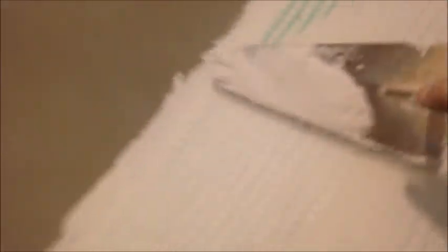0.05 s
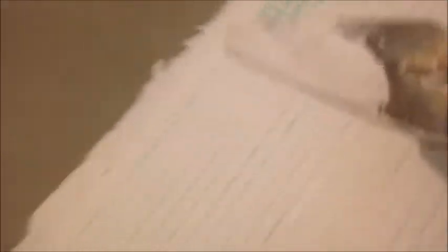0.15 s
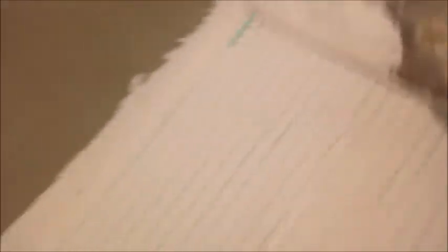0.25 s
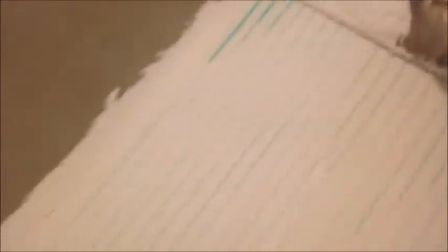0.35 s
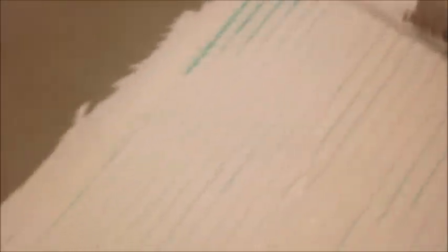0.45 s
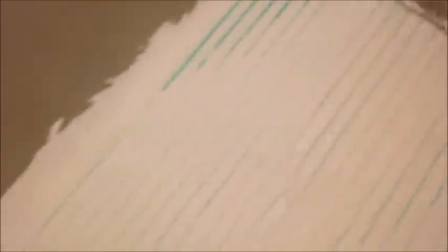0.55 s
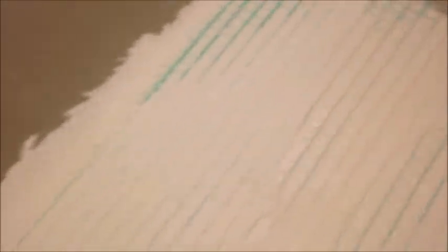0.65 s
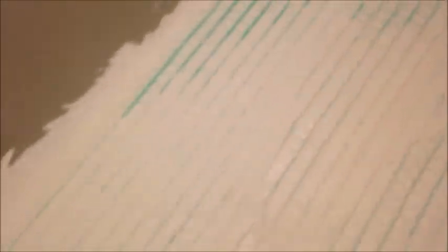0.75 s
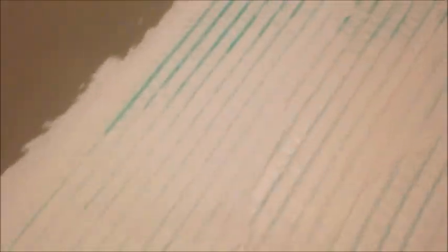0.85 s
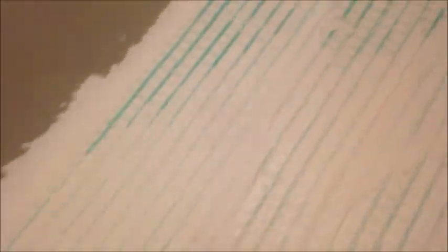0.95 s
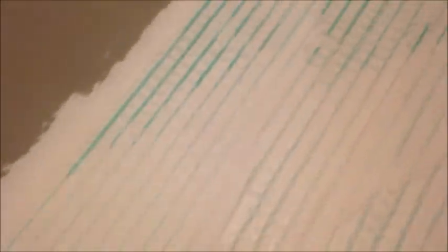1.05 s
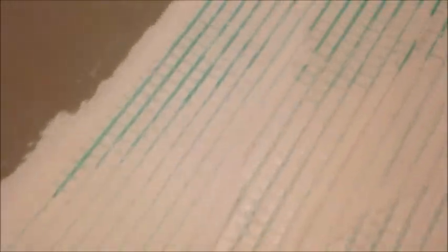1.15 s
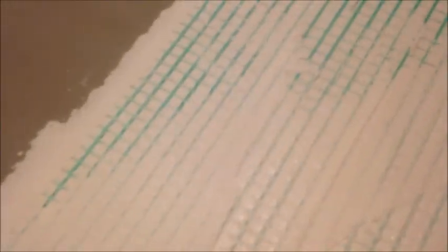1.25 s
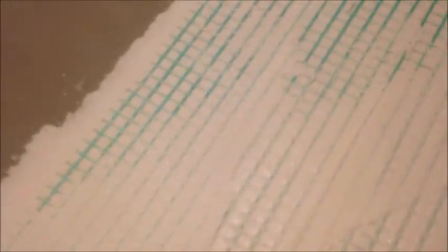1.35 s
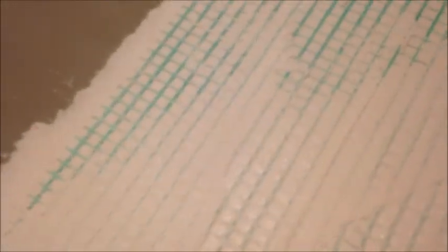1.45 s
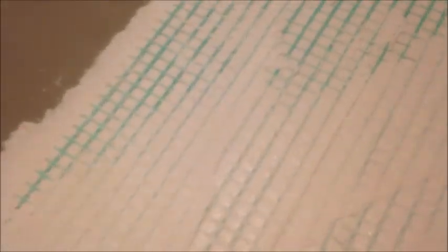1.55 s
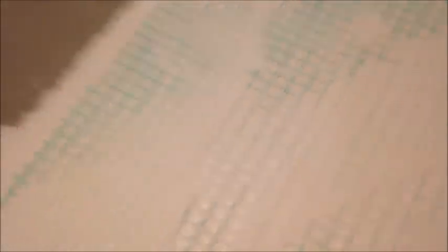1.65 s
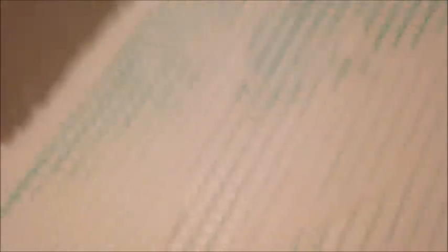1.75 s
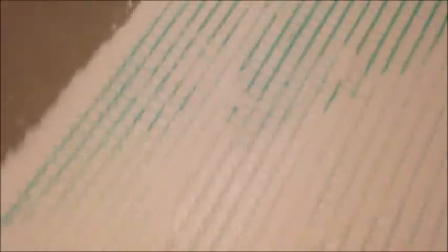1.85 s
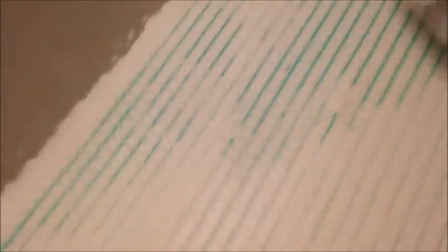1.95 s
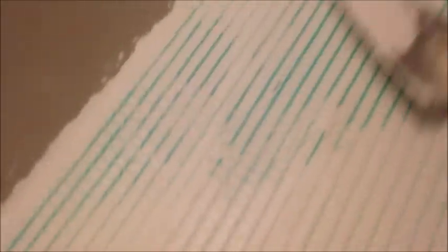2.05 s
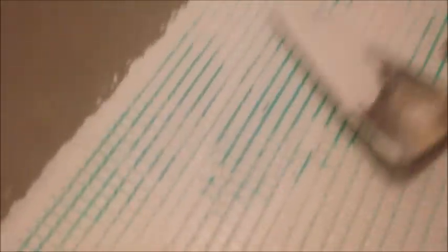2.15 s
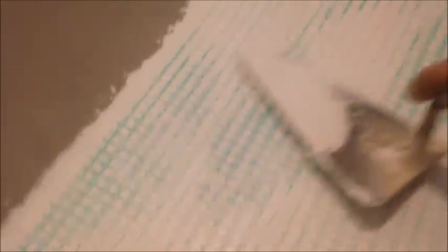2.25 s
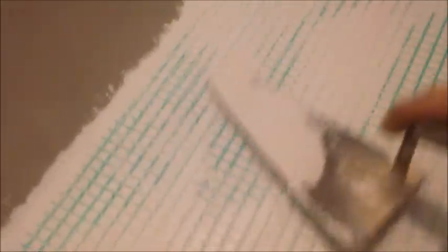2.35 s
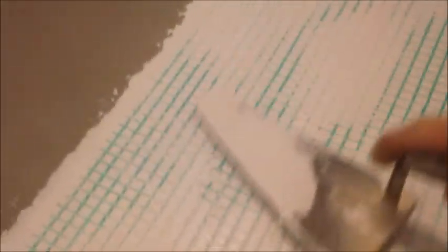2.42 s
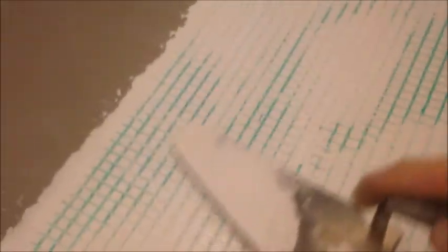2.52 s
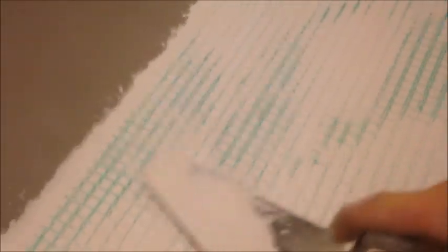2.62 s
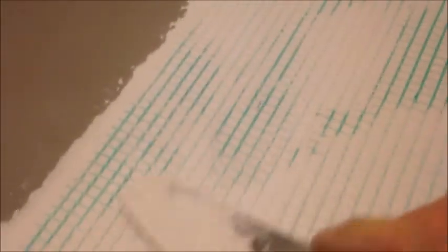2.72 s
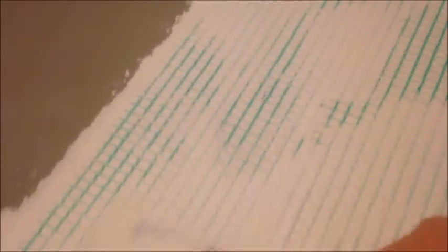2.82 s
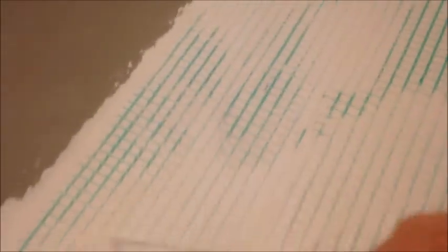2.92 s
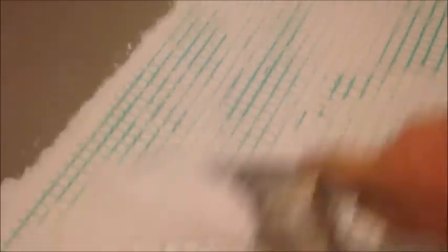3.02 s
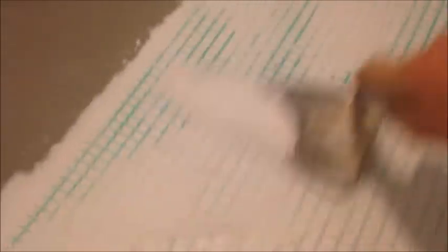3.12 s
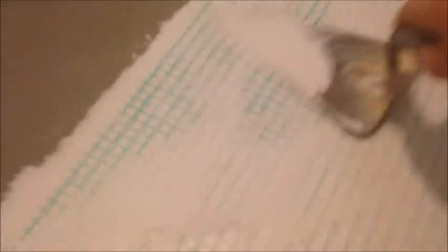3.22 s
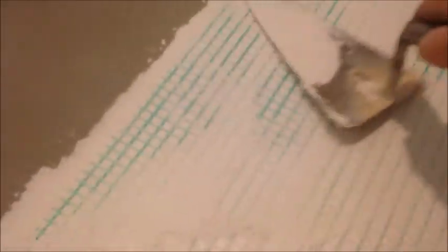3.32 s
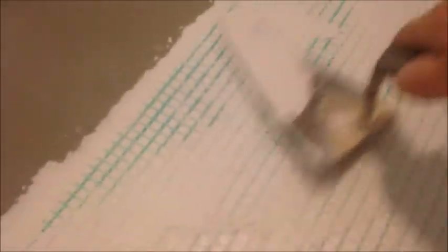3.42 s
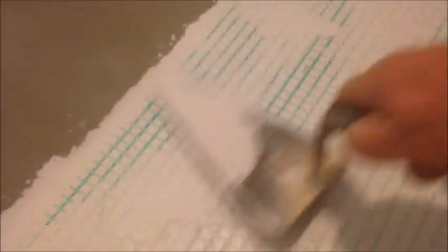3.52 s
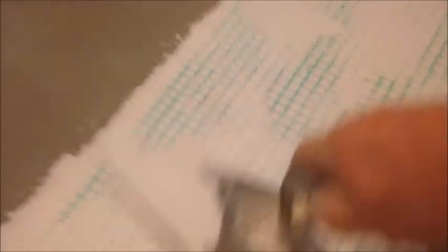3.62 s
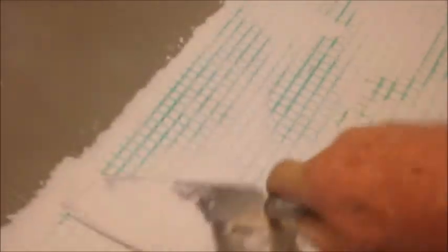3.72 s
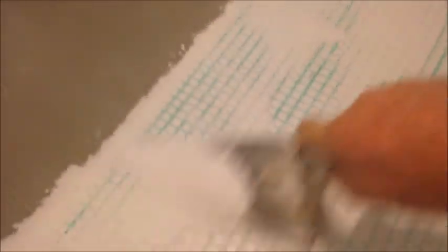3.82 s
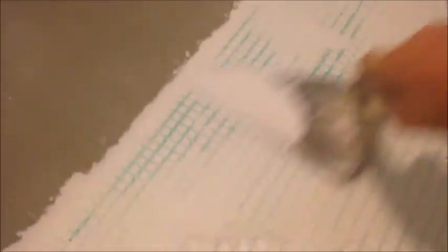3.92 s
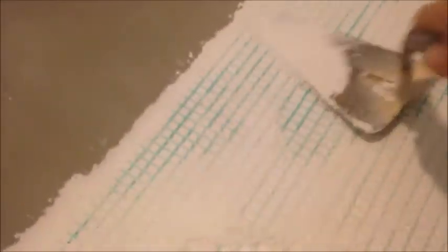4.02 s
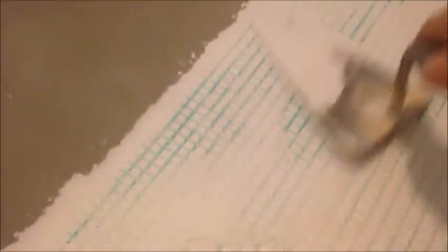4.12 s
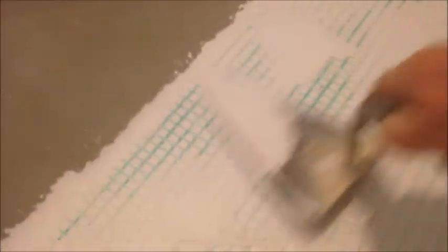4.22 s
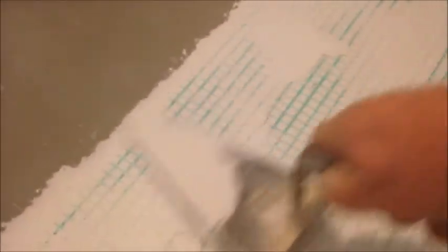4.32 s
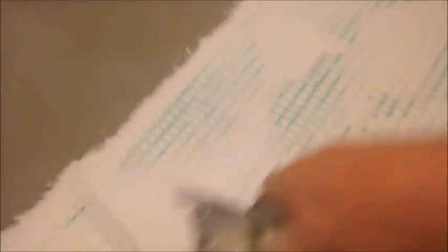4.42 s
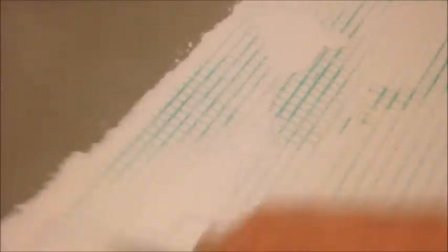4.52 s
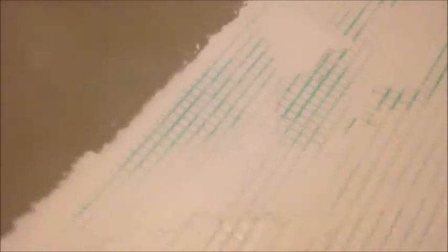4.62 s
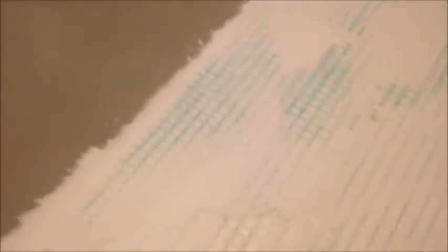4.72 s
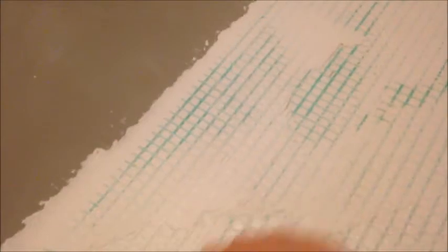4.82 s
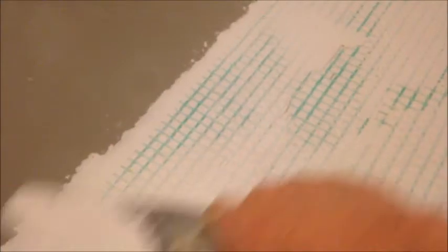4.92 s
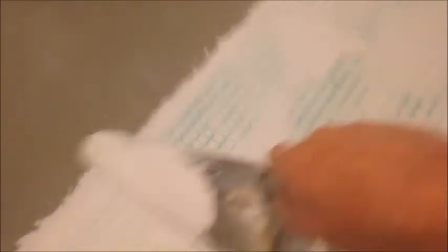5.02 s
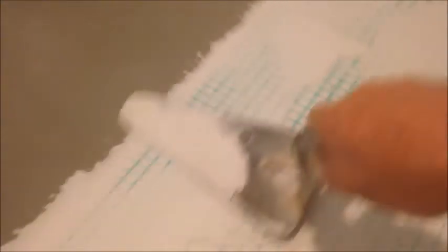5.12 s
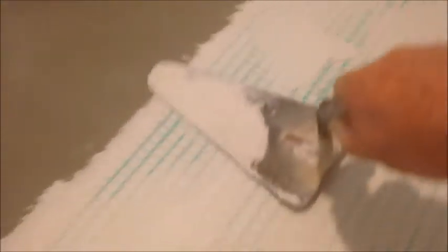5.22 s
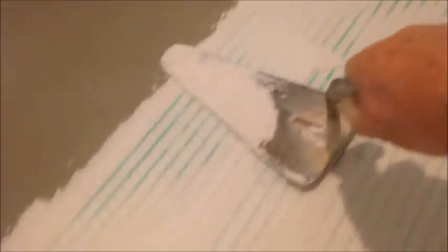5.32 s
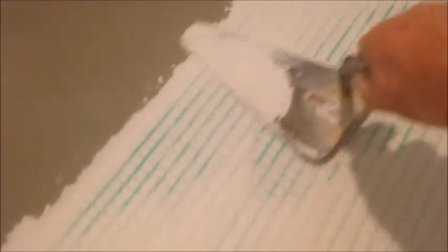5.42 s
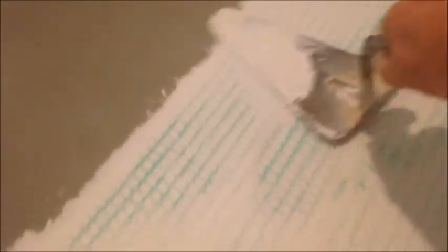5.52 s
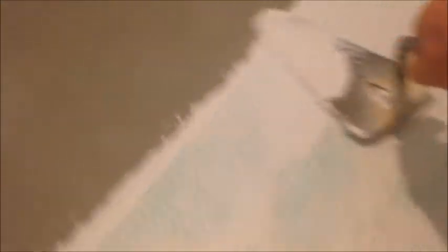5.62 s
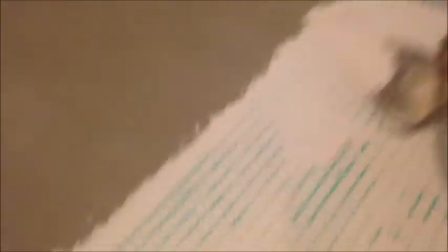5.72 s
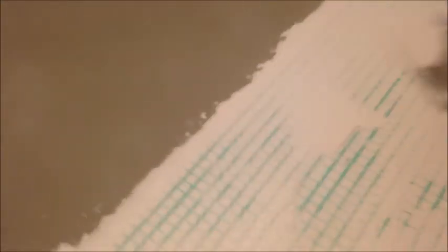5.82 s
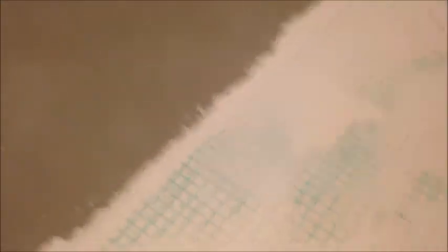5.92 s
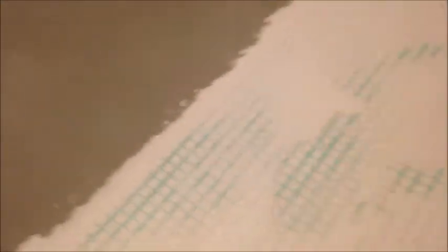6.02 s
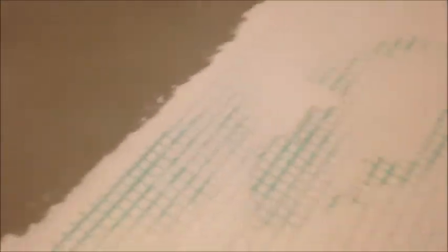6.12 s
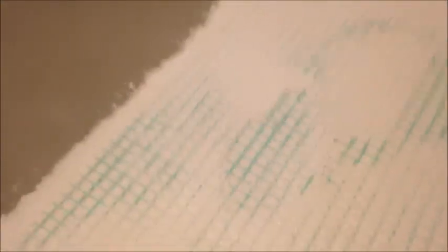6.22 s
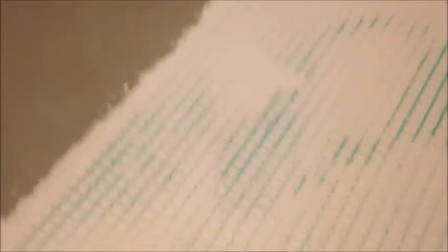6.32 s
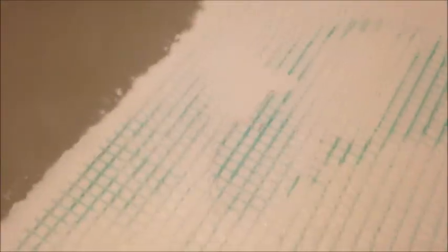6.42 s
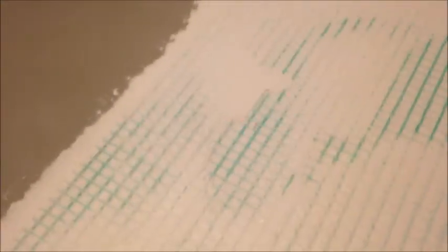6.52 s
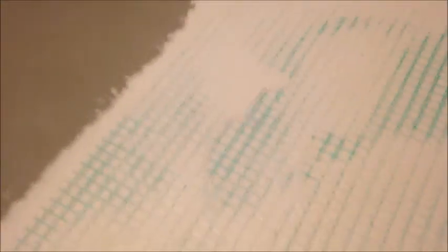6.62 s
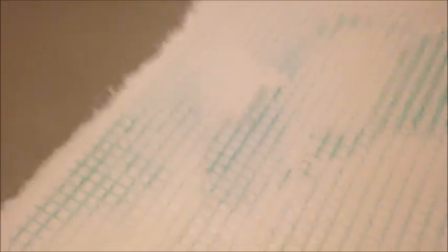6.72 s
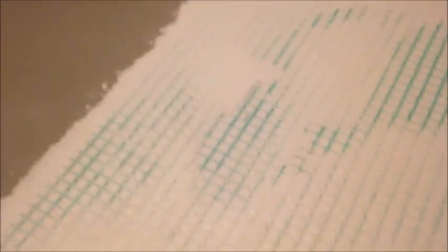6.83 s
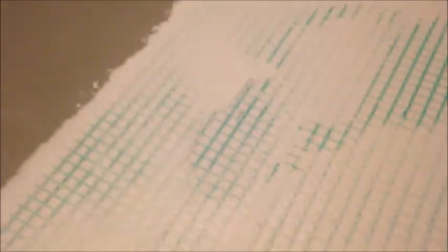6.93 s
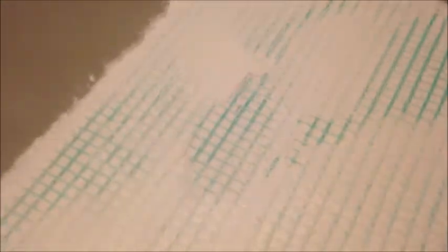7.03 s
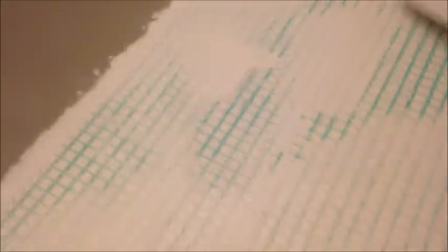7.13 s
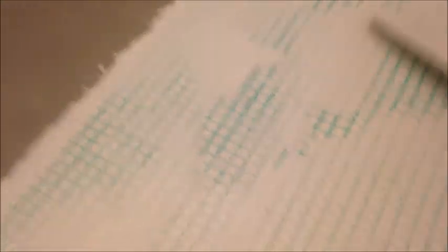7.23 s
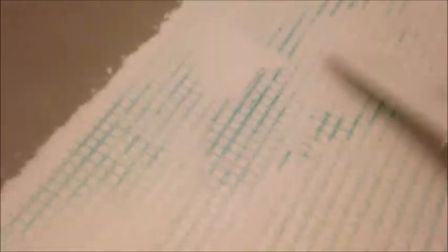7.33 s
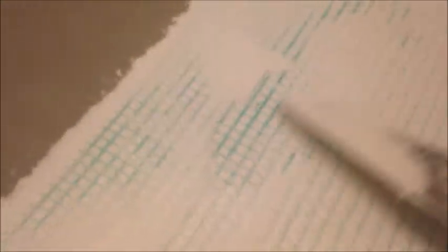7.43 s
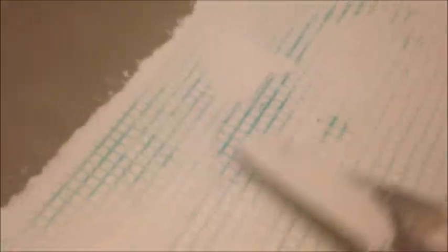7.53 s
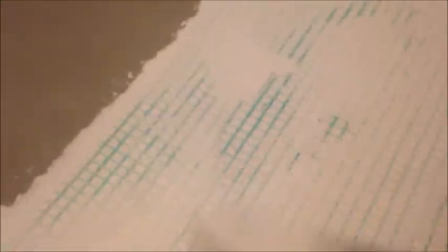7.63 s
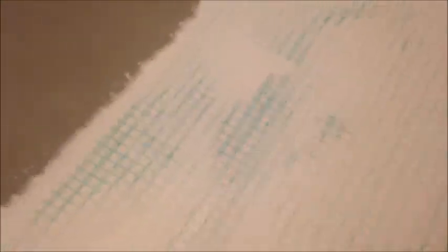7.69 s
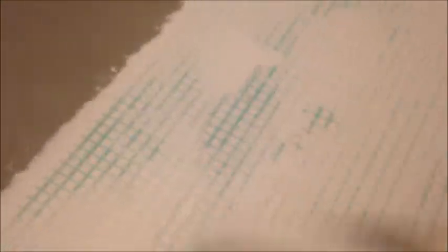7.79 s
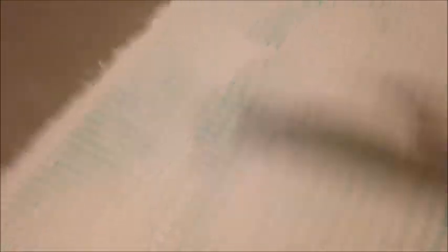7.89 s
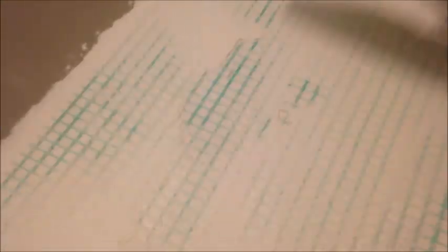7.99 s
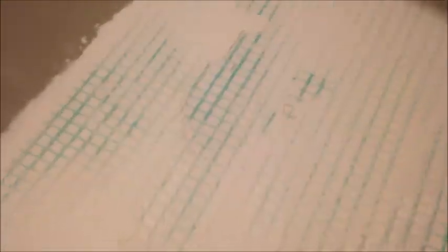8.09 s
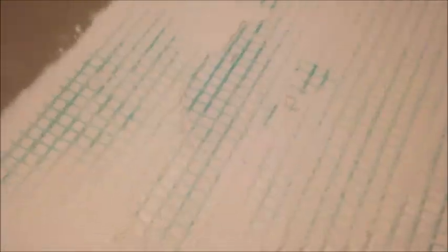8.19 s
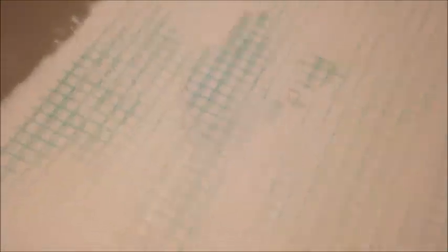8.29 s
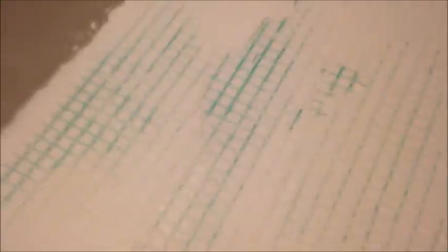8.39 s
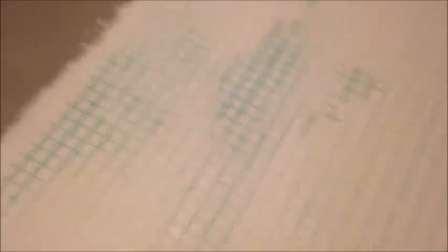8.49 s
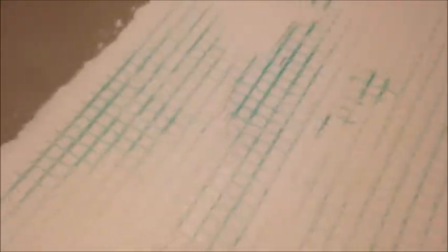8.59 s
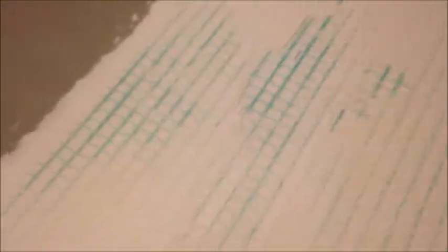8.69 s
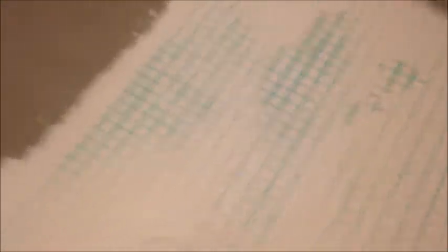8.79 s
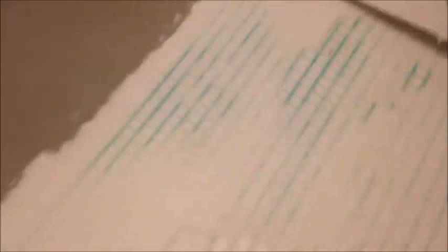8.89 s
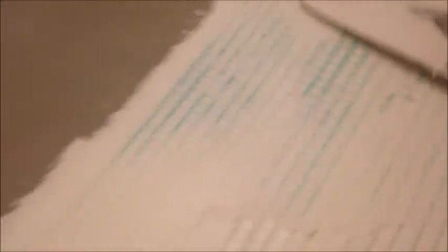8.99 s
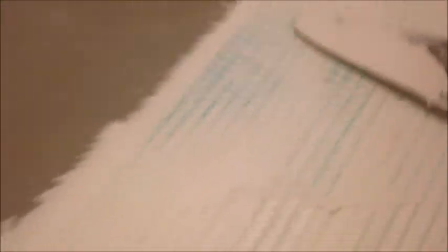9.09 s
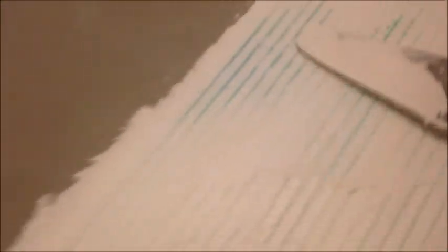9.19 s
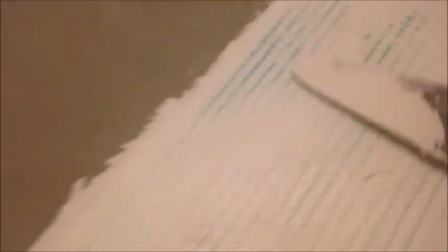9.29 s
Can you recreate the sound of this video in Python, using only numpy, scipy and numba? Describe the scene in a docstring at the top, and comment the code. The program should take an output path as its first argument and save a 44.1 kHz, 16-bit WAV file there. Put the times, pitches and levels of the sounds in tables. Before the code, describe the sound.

Sandy, crunching trowel strokes hiss and rasp across a hollow board, speeding up, then pausing, with metallic clicks and heavy landing thuds.

```python
"""Bare room: a steel trowel smooths wet, sandy adhesive into glass-fibre mesh on a hollow board.
Random sand-grain slips under the blade crunch, hiss and drive resonances of blade and board.
Mesh threads snap past the edge, trapped grains screech, and the edge clacks on grit and lumps.
The loaded trowel lands with dull thuds; diffuse echoes and quiet air noise lie behind."""
import sys
import numpy as np
from scipy import signal
from scipy.fft import rfft, irfft
from scipy.io import wavfile
from numba import njit

SR = 44100
rng = np.random.default_rng(int(sys.argv[2]) if len(sys.argv) > 2 else 0)


def digitize_waveform(pressure):
    """Quantize a signal to 16-bit integers and store it at the path in sys.argv[1].

    Rows of a 2-D input are taken as channels; values are limited to [-1, 1].
    """
    field = np.atleast_2d(pressure).T
    bounded = np.clip(field, -1, 1)
    quanta = np.round(bounded * 32767).astype(np.int16)
    wavfile.write(sys.argv[1], SR, quanta)


N = 412335

# Pushes of the trowel; part levels apply at the hardest point, before RESPONSE and the part trims:
# start t/s, swelling t/s, easing t/s, swell range/dB, ease range/dB, sand hiss level/dB, blade rasp level/dB,
# blade ring level/dB, board growl level/dB, drumming level/dB, body level/dB,
# edge sharpness (grit re hiss) level/dB, board f/Hz, blade f/Hz
PUSHES = [ (0.01, 0.0038, 0.04, -17, 5, -64.5, -62, -57.5, -61.5, -53, -49, -2, 590, 1770),
          (0.245, 0.0091, .012, 3.5, 7, -35.5, -39, -53, -33.5, -39, -37.5, -9, 710, 1770),
          (0.325, 0.08, 0.057, 2.5, -5.5, -36.5, -34.5, -43, -38, -52, -47, -8.5, 670, 1850),
          (0.455, 0.18, 0.14, 3, 3.2, -29, -33, -35.5, -24.5, -39, -39.5, -8, 576, 1360),
          (0.789, 0.094, 0.19, 1.5, 7.5, -28.5, -31, -39, -23.5, -42.5, -43, -8.5, 500, 1900),
          (1.09, 0.03, 0.33, -0.5, 7, -34, -42, -42, -37.5, -48.5, -45.5, -7, 635, 1720),
          (1.621, 0.12, 0.098, 6.5, 0.5, -39.5, -42.5, -59, -42.5, -55.5, -49, -4.5, 660, 1630),
          (2.035, 0.26, 0.062, 6, 1, -34, -35, -46, -37, -50, -44, -5, 716, 1570),
          (2.39, 0.11, 0.12, 0.5, -1, -30.5, -35.5, -59, -32, -43.5, -50, -9.5, 726, 1570),
          (2.66, 0.049, 0.13, -1.5, 4, -29.5, -34, -42, -30, -42.5, -49.5, -10.5, 567, 1610),
          (2.87, 0.1, 0.059, 4, 3, -32, -32.5, -38, -35.5, -41, -47, -11, 646, 1860),
          (3.257, 0.062, 0.072, 2.5, 1.5, -24.5, -25.5, -26.5, -22, -41, -47.5, -9.5, 628, 1890),
          (3.592, 0.023, 0.1, 5.5, 2, -20.5, -20, -46, -21, -40.5, -43, -11.5, 720, 1930),
          (3.74, 0.064, 0.049, 1, 8.5, -26, -24, -37, -23, -39, -38, -6.5, 613, 1850),
          (3.97, 0.012, 0.023, 3, -5.5, -32.5, -37, -50, -47, -59, -55, -7, 644, 1800),
          (4.037, 0.033, 0.11, 0, 5, -23.5, -24, -25.5, -17.5, -36, -43.5, -10.5, 590, 1480),
          (4.352, 0.037, 0.15, 6, 7.5, -21, -23.5, -36, -25.5, -44.5, -44.5, -6, 700, 1860),
          (4.583, 0.019, 0.068, 1.5, 4, -24, -24.5, -42, -33.5, -43.5, -41, -5.5, 690, 1970),
          (4.68, 0.059, 0.021, 3.5, 3, -24, -22.5, -37, -28, -49, -42, -5, 796, 1250),
          (4.955, 0.0084, 0.036, 3, 2.5, -30.5, -34, -52, -37, -53, -59, -6, 610, 1566),
          (5.027, 0.019, .04, 1, 2.5, -24, -26, -49, -32, -55, -46, -7, 590, 1650),
          (5.184, 0.044, 0.14, 0.5, 3.5, -25.5, -27, -37, -22.5, -41, -53, -2.5, 609, 1820),
          (5.415, 0.049, 0.15, 3, 7, -29, -34.5, -44, -30, -44, -57, -6, 730, 1660),
          (5.62, 0.099, 0.24, 0.5, 2, -34.5, -38.5, -44, -39, -54, -53.5, -6, 686, 2090),
          (6.01, 0.07, 0.05, 2, 2.5, -40, -39.5, -38.5, -34, -56, -48, -3.5, 700, 1550),
          (6.17, 0.39, .24, 7, 9, -51, -60, -56, -45, -52, -49.5, 4.5, 517, 1560),
          (7.105, 0.052, 0.19, 1.5, -2.5, -40, -40, -41, -50.5, -46.5, -51, -3, 550, 1640),
          (7.325, 0.13, 0.18, 5, -0.5, -35, -30, -39, -33, -46.5, -38.5, -2, 804, 1540),
          (7.635, 0.155, 0.093, 7.5, 11, -27.5, -24.5, -30, -21.5, -35.5, -28.5, -7.5, 575, 1380),
          (8.643, 0.01, .03, 3.5, 9.5, -58, -46, -42.5, -31, -63, -40, -11, 540, 1150),
          (8.72, 0.099, .01, 9, -2.5, -38.5, -42, -47, -40.5, -70, -60, -2, 640, 1400),
          (8.84, 0.13, .08, 7, 3.5, -31.5, -36, -49, -38, -52, -45.5, -7, 790, 1490),
          (9.06, 0.023, 0.09, 1, 6, -30.5, -34, -35, -27.5, -41, -42, -6.5, 810, 1670),
          (9.2, 0.025, 0.1, 4.5, 3, -30.5, -35.5, -39, -31, -49, -43, -8, 580, 1830)]
# Spells with the trowel down: from t/s, to t/s, settling t/s, lift-off t/s, light drag between pushes level/dB
TROWEL_DOWN = [(0, 0.097, .01, 0.11, -65), (0.243, 1.48, 0.0091, 0.14, -45.5),
               (1.563, 4.767, 0.067, 0.15, -49.5), (4.916, 6.542, 0.0092, 0.2, -44),
               (7.093, 7.853, .014, 0.074, -48), (8.55, 9.36, .04, .09, -52.5)]
# Response of each part to a push:
# effort scaling/(dB/dB), early start t/s, late stop t/s, attack rate/(dB/s), release rate/(dB/s)
PART_RESPONSE = { "hiss": (1.02, 0.0074, .002, 265, 220), "grit": (0.92, .006, 0.014, 260, 310),
                 "rasp": (0.96, 0.0012, 0.0026, 280, 360), "growl": (1.61, 0.0023, 0.014, 580, 340),
                 "drum": (0.71, 0.016, 0.013, 350, 160)}
# Edge over bare mesh: start t/s, length t/s, level/dB, first ring f/Hz, last ring f/Hz
BARE_MESH_PATCHES = [(2.05, .25, -44, 1940, 1700), (2.358, 0.2, -38, 1470, 1860),
                     (7.201, 0.24, -40.5, 1690, 1490), (7.422, .27, -36.5, 1800, 1300),
                     (7.726, 0.081, -32, 1400, 2200)]
# Trapped grains screeching: start t/s, length t/s, level before gating/dB, ring f/Hz
GRAIN_SCREECHES = [(0.633, 0.061, -33.5, 3900), (1.112, 0.22, -41.5, 1720), (2.952, .016, -35.5, 1930),
                   (2.973, 0.078, -41.5, 3250), (3.232, 0.043, -29, 4200), (4.084, 0.022, -28, 3820),
                   (4.757, 0.023, -30, 4150), (4.946, 0.0089, -22.5, 4030), (4.974, 0.036, -34, 5300),
                   (5.056, .014, -22, 5040), (5.792, 0.019, -39, 5200), (7.013, 0.007, -38.5, 2600),
                   (7.135, 0.12, -42.5, 1560)]
# Edge catching on a grain (bright) or lump (dull): start t/s, peak level/dB, ring f/Hz, rattle t60/s
EDGE_CLACKS = [(0.258, -30, 4500, 0.038), (0.6525, -17, 4000, .02), (1.117, -23, 1750, .04),
               (2.338, -24, 1400, 0.036), (2.492, -23, 4400, .02), (2.834, -21, 2120, .04),
               (3.607, -10, 4500, 0.09), (3.807, -23, 750, 0.027), (4.117, -14, 734, 0.024),
               (4.467, -12, 6200, 0.016), (4.601, -16, 5030, .02), (4.683, -19, 1660, .03),
               (4.920, -22, 4500, .12), (4.948, -17, 4020, 0.067), (5.0525, -3, 4560, 0.061),
               (5.062, -8, 5300, 0.044), (5.179, -18, 4500, .02), (5.241, -13.5, 4500, 0.026),
               (5.737, -24.5, 730, 0.035), (5.8, -22, 5300, 0.027), (7.052, -36, 4500, .03),
               (7.111, -25, 9100, .02), (7.16, -26, 12000, .012), (7.241, -24, 1590, .05),
               (8.464, -28, 4140, 0.04), (8.8218, -19, 3620, 0.043), (8.823, -27, 1710, .03),
               (8.935, -20.5, 5300, 0.067)]
# Soft blows on the board: start t/s, peak level of the first push/dB, low-pass f/Hz, high-pass f/Hz,
# shudder and boom trim level/dB
BOARD_BLOWS = [(0.002, -21.5, 76, 16, -1), (0.247, -22.5, 2420, 30, 0), (1.4695, -15.5, 800, 110, -5),
               (4.919, -26, 1100, 39, 1), (4.931, -32.5, 150, 37, 0), (6.076, -25, 800, 170, 0),
               (6.0815, -19.5, 900, 150, 0), (6.504, -33, 453, 32, -1), (6.533, -36, 246, 30, -1),
               (6.611, -41.5, 150, 33, 0), (6.644, -38.5, 63.8, 20, 1), (6.713, -44.5, 158, 35, -1),
               (7.002, -9, 1880, 16, 0.5), (7.019, -25, 1500, 30, -1), (7.056, -26.5, 910, 49, 3),
               (7.964, -41, 65, 24, -4.5), (8.031, -43.5, 65, 27, -5.5), (8.463, -6, 2200, 20, -0.5),
               (8.585, -31, 920, 30, -2), (8.654, -25, 1150, 200, 0)]
# Board modes rung by a blow: f/Hz, level/dB, t60/s
BLOW_MODES = [(125.6, 0.5, 0.22), (177.5, -11, 0.28), (467, -3, 0.11), (527, -4, 0.23), (685, -9.5, 0.23),
              (1067, -12.5, .21), (1194, -5, .2), (1494, -3.5, 0.25)]
# Low body modes of the board: f/Hz, level/dB
LOW_BOARD_MODES = [(215, 2), (262, -1.5), (310, 0), (350, 0.5), (419, 0.5)]
# Growl modes of the board: f/Hz, level/dB
GROWL_MODES = [(419, -10), (504, 6.5), (598, -1.5), (632, -4), (717, -2), (800, -0.5), (954, 3.5)]
# Rasp modes of the blade: f/Hz, level/dB
RASP_MODES = [(1050, 2.5), (1220, 0.5), (1420, 4), (1610, -6), (1856, -5), (1980, -13.5), (2060, -3),
              (2436, 6)]
# Edge modes of the blade: f/Hz, level/dB
BRIGHT_EDGE_MODES = [(3192, -3), (3565, -2.5), (4170, -1), (4756, -3.5), (5400, -5.5), (6200, -4),
                     (7200, -7.5)]
# Spectrum of the scrape: f/Hz, density level/(dB per Hz)
SCRAPE_SPECTRUM = [(200, -14.5), (260, -5.5), (380, 0.5), (500, -1.5), (720, -1), (1150, -1.5), (1500, -4),
                   (2300, -3.5), (2950, -11.5), (4200, -8), (6500, -10.5), (10000, -19.5), (15300, -28)]
# Spectrum of a blow on the board: f/Hz, density level/(dB per Hz)
BLOW_SPECTRUM = [(30, -15), (85, -6), (135, 7), (200, 7), (320, 0.5), (600, 1.5), (1000, -3), (2500, -8),
                 (3300, -15.5), (4300, -5.5), (6200, -17), (15000, -10)]
# Spectrum of the quiet room: f/Hz, density level/(dB per Hz)
AIR_SPECTRUM = [(25, -10), (120, 0), (220, -8), (500, -6), (1000, -13), (2500, -18), (8000, -21),
                (15000, -22)]
# Decay of the bare room: f/Hz, t60/s
ROOM_DECAY = [(60, 1.4), (130, 0.66), (250, 0.67), (500, 1.01), (1000, 1.13), (2000, 0.83), (4000, 0.74),
              (8000, 1.08), (15000, 0.5)]

GROWL_TRIM_DB, RASP_TRIM_DB, HISS_TRIM_DB, DRUM_TRIM_DB, BODY_TRIM_DB = -6, -4.5, -0.88, 0, -4.5
BOARD_SAG_OCT_PER_S, BLADE_SAG_OCT_PER_S = 0.21, 0.91  # resonances sink as the blade travels
THREADS_PER_S, THREAD_SPEEDUP = 260, .4  # mean rate at patch start; share gained by its end
AIR_DB = -63.5
CUTOFF_HZ = 15400


def scraping(drag_grit_db=-6, drag_growl_db=-2):
    """Grain slips drive board growl, drumming and body, blade rasp and ring, and edge hiss and grit."""
    (hiss_gain, grit_gain, rasp_gain, ring_gain, growl_gain, drum_gain, body_gain,
     board_hz, blade_hz) = push_controls()
    contact, drag = touching()
    # bumps over mesh threads, stick and slide in the paste
    catching = from_db(1.22 * drift(350) + 0.85 * drift(40) + 0.93 * drift(20))
    sand = grains(catching, per_s=14000, spread_db=-1.0)
    crunch = coloured(sand, SCRAPE_SPECTRUM)
    growl = board_growl(crunch, sand, board_hz)
    rasp = blade_rasp(catching, blade_hz)
    # undamped blade near 3 kHz
    ring = rms_one(cut(crunch, [2700, 3400], "band"))
    steel_hiss, grit = edge_hiss(catching)
    drum, body = board_drumming(sand)
    # push and drag add as powers
    hiss = steel_hiss * np.hypot(hiss_gain, drag)
    hiss = hiss + grit * np.hypot(grit_gain, drag * from_db(drag_grit_db))
    blade = (rasp * np.hypot(rasp_gain, drag) + ring * ring_gain) * from_db(RASP_TRIM_DB)
    blade = blade + hiss * from_db(HISS_TRIM_DB)
    board = growl * np.hypot(growl_gain, drag * from_db(drag_growl_db)) * from_db(GROWL_TRIM_DB)
    board = board + drum * drum_gain * from_db(DRUM_TRIM_DB)
    board = board + body * body_gain * from_db(BODY_TRIM_DB)
    return contact * (blade + board)


def board_growl(crunch, sand, board_hz):
    """The crunch rings the board under the blade: broad band, moving resonance and sheet modes."""
    low = cut(cut(crunch, 1024, "low", order=4), 427, "high", order=4)
    low = resonance(resonance(low, 1.12 * board_hz, q=0.97), 1.12 * board_hz, q=1.0)
    moving = resonance(low, board_hz * np.exp(0.04 * drift(13)), q=6.5)
    modes = sheet_modes(low, GROWL_MODES, q=27, swell_db=6, bend=0.015)
    growl = rms_one(0.87 * rms_one(low) + 1.4 * rms_one(moving) + 1.44 * modes)
    return growl + 0.095 * rms_one(cut(sand, [220, 400], "band"))


def blade_rasp(catching, blade_hz):
    """Coarse grains make the steel sheet rasp at a moving resonance and its modes."""
    coarse = coloured(grains(catching, per_s=9000, spread_db=-0.5), SCRAPE_SPECTRUM)
    middle = cut(coarse, [950, 2750], "band", order=4)
    moving = resonance(middle, blade_hz, q=2.0)
    modes = sheet_modes(middle, RASP_MODES, q=46, swell_db=9.5, bend=0.029)
    return rms_one(rms_one(middle) + 1.34 * rms_one(moving) + 0.95 * modes)


def edge_hiss(catching):
    """Fine grains hiss along the edge; a steeply held edge adds finer, brighter grit."""
    fine = coloured(grains(catching, per_s=14000, spread_db=1.0), SCRAPE_SPECTRUM)
    top = cut(cut(fine, 2870, "high", order=4), 8800, "low", order=4)
    modes = sheet_modes(top, BRIGHT_EDGE_MODES, q=29, swell_db=9.5, bend=0.038)
    steel_hiss = 0.71 * rms_one(rms_one(top) + 0.3 * modes)
    finest = coloured(grains(catching, per_s=9000, spread_db=2.5), SCRAPE_SPECTRUM)
    return steel_hiss, 0.77 * rms_one(cut(finest, 8500, "high", order=4))


def board_drumming(sand):
    """The hollow board drums at its lowest modes; weaker body modes sound above."""
    lowest = resonance(resonance(sand, 128.7, q=15.6), 108.6, q=7.4)
    drum = rms_one(lowest) + 0.42 * rms_one(cut(sand, [35, 100], "band"))
    broad = resonance(resonance(sand, 181, q=4.0), 167, q=2.3)
    modes = sheet_modes(cut(sand, [190, 440], "band"), LOW_BOARD_MODES, q=12, swell_db=1.5, bend=0.065)
    return drum, rms_one(rms_one(broad) + 0.9 * modes)


def grains(catching, per_s, spread_db):
    """Grains slip at random instants with random size and sign, weighted by catching; unit power."""
    sizes = from_db(spread_db * np.minimum(rng.exponential(1, N), 6)) * rng.choice([-1, 1], N)
    return rms_one(sizes * (rng.random(N) < per_s / SR) * catching)


def sheet_modes(x, modes, q, swell_db, bend):
    """Damped sheet modes; each swells, fades and bends as the contact point travels."""
    out = 0
    for hz, db in modes:
        strength = from_db(db + swell_db * np.clip(drift(18), -2, 1.5))
        bent_hz = hz * np.exp(bend * np.clip(drift(9), -2, 2))
        out = out + strength * resonance(x, bent_hz, q)
    return rms_one(out)


def touching():
    """Contact gain (blade settles into paste, zero while lifted) and gain of its light drag."""
    t = np.arange(N) / SR
    contact, drag = np.zeros(N), np.zeros(N)
    for start, end, settle_s, lift_s, drag_db in TROWEL_DOWN:
        settling = np.clip((t - start) / settle_s + .5, 0, 1)
        lifting = np.clip((end - t) / lift_s + 1, 0, 1)
        contact += settling * lifting
        drag += settling * lifting * from_db(drag_db)
    return contact, drag


def push_controls():
    """Per-sample part gains from the loudest push, and board and blade f/Hz weighted by push."""
    t = np.arange(0, N, 64) / SR
    pushes = {part: from_db([push_db(t, response, *row[:5]) for row in PUSHES])
              for part, response in PART_RESPONSE.items()}
    columns = np.transpose(PUSHES)[:, :, None]
    start, swell_s = columns[:2]
    hiss, rasp, ring, growl, drum, body, sharpness, board_hz, blade_hz = columns[5:]
    levels = [(hiss, "hiss"), (hiss + sharpness, "grit"), (rasp, "rasp"), (ring, "rasp"),
              (growl, "growl"), (drum, "drum"), (body, "drum")]
    gains = [(from_db(db) * pushes[part]).max(axis=0) for db, part in levels]
    share = pushes["hiss"] / pushes["hiss"].sum(axis=0)
    travel_s = np.clip(t - start - swell_s, -.5, .5)  # from the hardest point
    sags = (board_hz, BOARD_SAG_OCT_PER_S), (blade_hz, BLADE_SAG_OCT_PER_S)
    pitches = [(share * hz * 2 ** (-sag * travel_s)).sum(axis=0) for hz, sag in sags]
    return in_time(np.column_stack([t, *gains, *pitches]))


def push_db(t, response, start, swell_s, ease_s, swell_db, ease_db):
    """One push in dB: quick attack, swell to 0 dB, easing off, quick release."""
    follows, early_s, late_s, attack_db_per_s, release_db_per_s = response
    hardest = start + abs(swell_s)
    end = hardest + abs(ease_s)
    effort_db = np.interp(t, [start, hardest, end], [-swell_db, 0, -ease_db])
    attack_db = attack_db_per_s * np.maximum(start - early_s - t, 0)
    release_db = release_db_per_s * np.maximum(t - end - late_s, 0)
    return np.maximum(follows * effort_db - attack_db - release_db, -200)


def mesh_scratch(jitter=0.27, snap_s=0.0033, uneven_db=2.5, q=2.6, wander=0.19, fade_s=0.058):
    """The edge snaps off successive threads, ever faster; snaps ring the blade, shifting as it tilts."""
    out = np.zeros(N)
    for s, length_s, db, first_hz, last_hz in BARE_MESH_PATCHES:
        t = np.arange(int(length_s * SR)) / SR
        speedup = 1 + THREAD_SPEEDUP * t / length_s
        threads_per_s = THREADS_PER_S * speedup * np.exp(jitter * drift(70)[:len(t)])
        since_snap_s = np.cumsum(threads_per_s) / SR % 1 / threads_per_s
        uneven = from_db(uneven_db * drift(110)[:len(t)])
        snaps = rng.standard_normal(len(t)) * np.exp(-since_snap_s / snap_s) * uneven
        hz = np.interp(t, [0, length_s], [first_hz, last_hz]) * np.exp(wander * drift(20)[:len(t)])
        gate = np.clip(np.minimum(t, length_s - t) / fade_s, 0, 1)
        ringing = rms_one(resonance(cut(snaps, [750, 3000], "band"), hz, q))
        add(out, s, from_db(db) * gate * ringing)
    return out


def screeches(q=10.0, rise_s=0.0086, fall_s=0.0032):
    """A trapped grain dragged under the edge briefly excites one blade resonance."""
    out, t = np.zeros(N), np.arange(SR // 2) / SR
    slips = grains(1, per_s=1800, spread_db=2.5)
    for s, length_s, db, hz in GRAIN_SCREECHES:
        gate = np.clip(t / rise_s, 0, 1) * np.exp(-np.maximum(t - length_s, 0) / fall_s)
        dragged = cut(slips[int(s * SR):][:len(t)], [0.53 * hz, 1.5 * hz], "band")
        add(out, s, from_db(db) * gate * rms_one(resonance(dragged, hz, q)))
    return out


def clacks(crack_t60=0.0023, rattle=0.13):
    """A noise crack of steel on grit and a brief rattle, mostly in a band around the blade's ring."""
    out, t = np.zeros(N), np.arange(SR // 8) / SR
    for s, db, hz, rattle_t60 in EDGE_CLACKS:
        decay = from_db(-60 * t / crack_t60) + rattle * from_db(-60 * t / rattle_t60)
        contact = rng.standard_normal(len(t)) * decay
        sound = cut(contact, [0.78 * hz, 1.24 * hz], "band") + 0.051 * contact
        add(out, s, from_db(db) * sound / np.abs(sound).max())
    return out


def thuds(toe=0.55, toe_s=0.0011, flutter=0.03, flutter_t60=0.2, boom=0.0047,
          squelch_db=-47.0, squelch_t60=1.0, soak=0.21):
    """Paste-cushioned heel-then-toe landings; the board shudders and booms, paste squelches out."""
    out, t = np.zeros(N), np.arange(SR // 2) / SR
    boom_modes = boom * sum(from_db(mode_db - 60 * t / t60) * np.sin(2 * np.pi * hz * t)
                            for hz, mode_db, t60 in BLOW_MODES)
    for s, db, bright_hz, lowest_hz, after_db in BOARD_BLOWS:
        chance = rng.standard_normal(len(t))
        heel = t == 0
        push = heel + toe * min(bright_hz / 2200, 1) * (np.arange(len(t)) == int(toe_s * SR))
        shudder = flutter * chance * from_db(-60 * t / flutter_t60) * (1 - np.exp(-t / 0.0006))
        # duller blow: more soaked up by paste
        after = from_db(after_db) * (shudder + boom_modes) * (bright_hz / 1500) ** soak
        first, after = (cut(cut(coloured(part, BLOW_SPECTRUM), lowest_hz, "high"),
                            bright_hz, "low", order=4) for part in (push, after))
        # sharper landing: louder squelch
        squelch_gain = from_db(squelch_db - 60 * t / squelch_t60) * min(bright_hz / 1500, 1) ** 2
        squelch = squelch_gain * rms_one(cut(chance, [1500, 6000], "band"))
        add(out, s, from_db(db) * ((first + after) / np.abs(first).max() + squelch))
    return out


def room(x, wet_db, wall_hz):
    """Diffuse echoes of hard walls: noise bands about an octave wide, each with its own decay."""
    t = np.arange(int(1.5 * SR)) / SR
    edges_hz, tail = np.geomspace(40, 16000, 10), 0
    for low, high in zip(edges_hz, edges_hz[1:]):
        band = cut(rng.standard_normal(len(t)), [low, high], "band", order=3)
        tail = tail + band * from_db(-60 * t / at_hz(ROOM_DECAY, np.sqrt(low * high)))
    tail = cut(tail * (1 - np.exp(-t / 0.0021)), wall_hz, "low", order=1)
    return from_db(wet_db) * signal.fftconvolve(x, tail / np.sqrt(np.sum(tail ** 2)))[:N]


def still_air():
    """Steady coloured noise of the quiet room."""
    return from_db(AIR_DB) * rms_one(coloured(rng.standard_normal(N), AIR_SPECTRUM))


def from_db(db):
    """Decibels to gain."""
    return np.exp(np.asarray(db) * (np.log(10) / 20))


def rms_one(x):
    """Scale to unit power."""
    return x / np.sqrt(np.mean(x ** 2) + 1e-20)


def in_time(rows):
    """Interpolate each column of a curve (t/s first) to every sample."""
    s, *columns = np.transpose(rows)
    return [np.interp(np.arange(N) / SR, s, c) for c in columns]


def at_hz(points, hz):
    """Read a table on a log-frequency axis."""
    points = np.array(points)
    return np.interp(np.log(np.maximum(hz, 1)), np.log(points[:, 0]), points[:, 1])


def cut(x, hz, kind, order=2):
    """Butterworth filter."""
    sos = signal.butter(order, np.clip(hz, 10, SR / 2 - 500), kind, fs=SR, output="sos")
    return signal.sosfilt(sos, x)


def coloured(x, spectrum):
    """Causal (minimum-phase) filter with the given spectrum, by folding the cepstrum."""
    size = 8192
    cepstrum = irfft(np.log(from_db(at_hz(spectrum, np.fft.rfftfreq(size, 1 / SR)))))
    cepstrum[1:size // 2] *= 2
    cepstrum[size // 2 + 1:] = 0
    return signal.fftconvolve(x, irfft(np.exp(rfft(cepstrum))))[:len(x)]


def drift(per_s):
    """Random curve joining per_s normal knots a second; mean square about 1."""
    knots = rng.standard_normal(N // 40)
    return np.interp(np.arange(N) / SR * per_s, np.arange(len(knots)), knots) * np.sqrt(3 / 2)


@njit
def glide(x, tuning, damping):
    """State-variable band-pass with movable centre; unit gain at the peak."""
    out, low, band = np.zeros(len(x)), 0., 0.
    for i in range(len(x)):
        low += tuning[i] * band
        band += tuning[i] * (x[i] - low - damping * band)
        out[i] = damping * band
    return out


def resonance(x, hz, q):
    """One resonance, steady or moving."""
    return glide(x, 2 * np.sin(np.pi * hz / SR) * np.ones(len(x)), 1 / q)


def add(out, s, sound):
    """Mix a sound in at s seconds."""
    start = max(int(s * SR), 0)
    out[start:start + len(sound)] += sound[:N - start]


def scene():
    """Scraping, scratching and blows close by; room echoes and still air behind."""
    strokes = scraping() + mesh_scratch() + screeches() + clacks()
    blows = thuds()
    echoes = room(strokes + 1.28 * blows, wet_db=-16.0, wall_hz=4500)
    return (strokes + blows + echoes + still_air())[None]


def record(dry):
    """Microphone: deepest bass lost, peaks rounded, top cut."""
    rounded = 1.819 * np.tanh(cut(dry, 37, "high") / 1.247)
    top_cut = signal.ellip(10, .1, 90, CUTOFF_HZ, fs=SR, output="sos")
    return signal.sosfilt(top_cut, rounded)


dry = scene()
out = record(dry)
digitize_waveform(out)
```